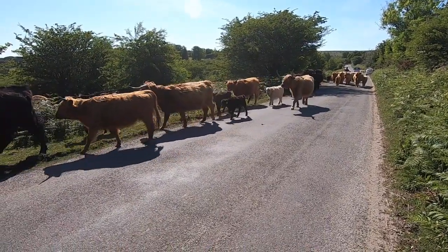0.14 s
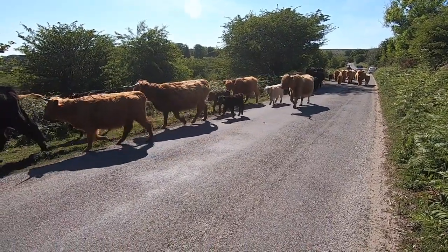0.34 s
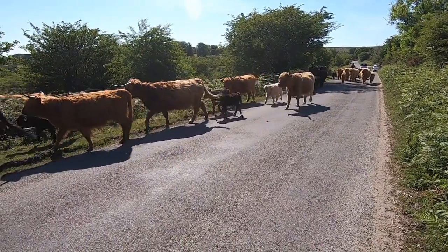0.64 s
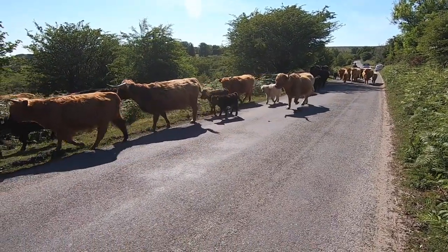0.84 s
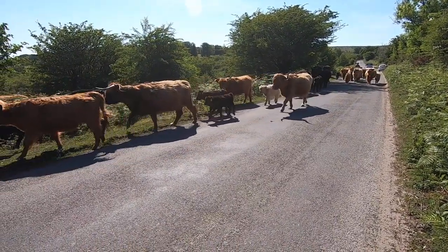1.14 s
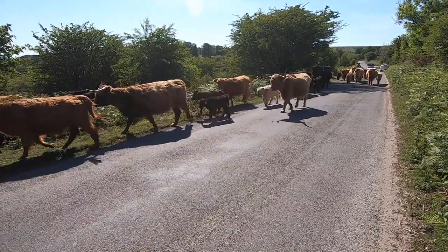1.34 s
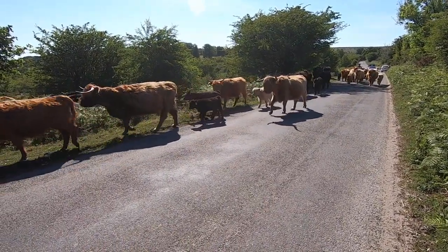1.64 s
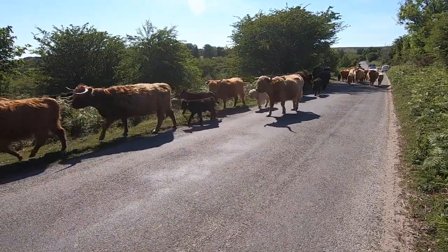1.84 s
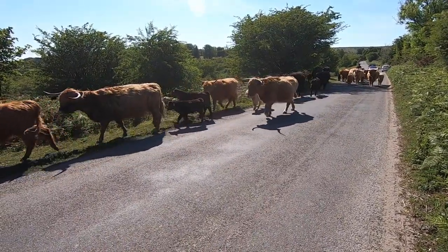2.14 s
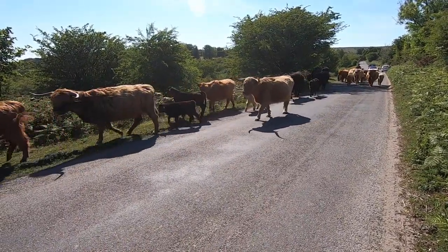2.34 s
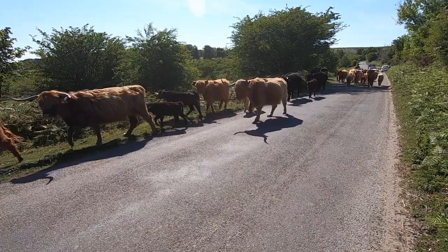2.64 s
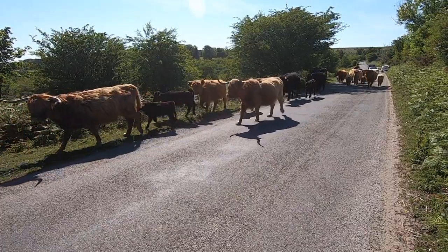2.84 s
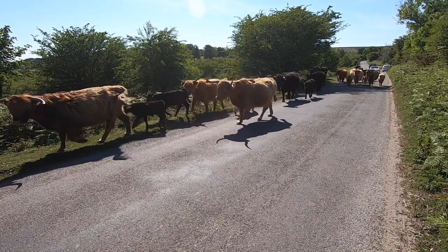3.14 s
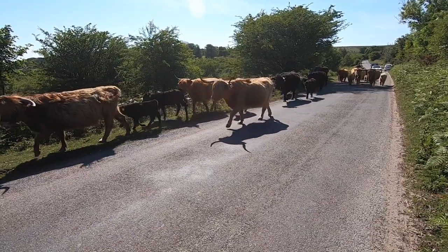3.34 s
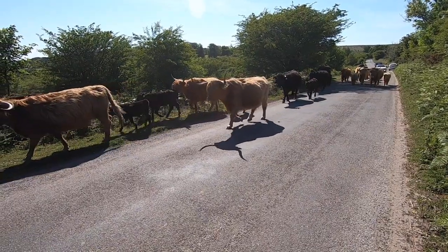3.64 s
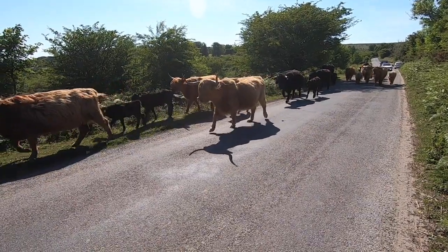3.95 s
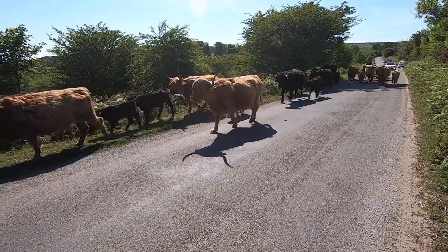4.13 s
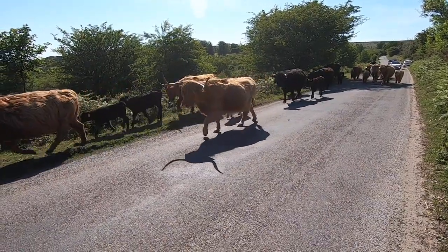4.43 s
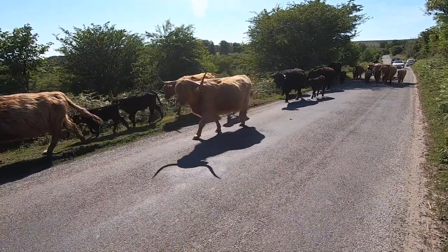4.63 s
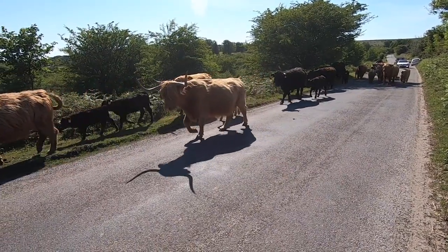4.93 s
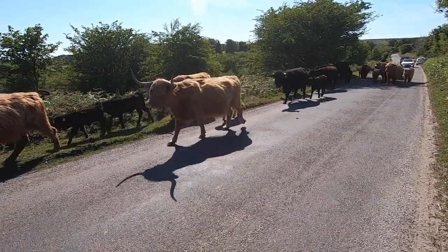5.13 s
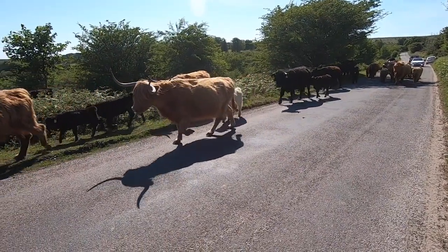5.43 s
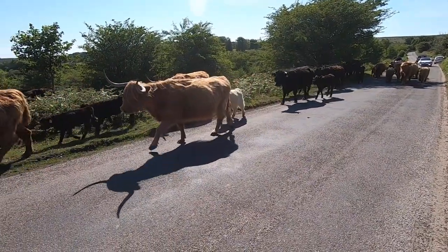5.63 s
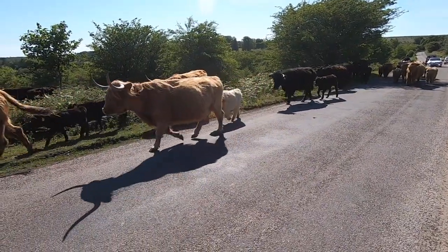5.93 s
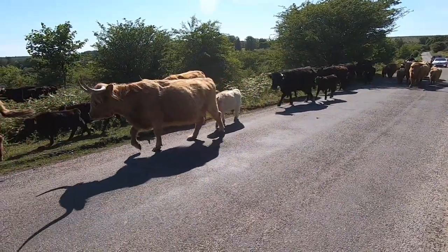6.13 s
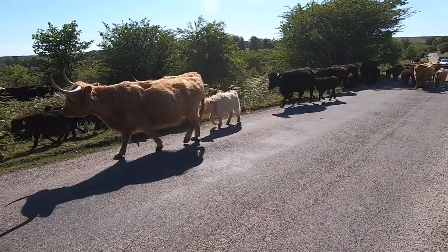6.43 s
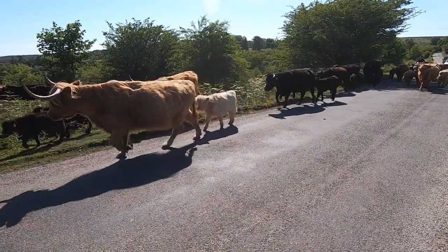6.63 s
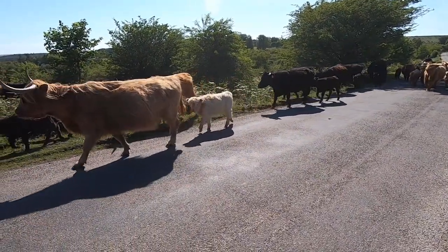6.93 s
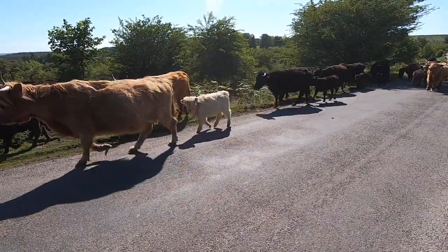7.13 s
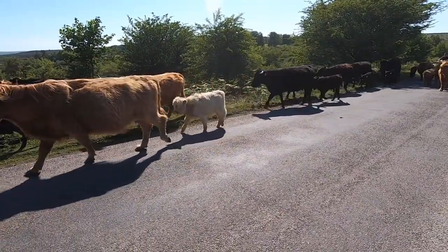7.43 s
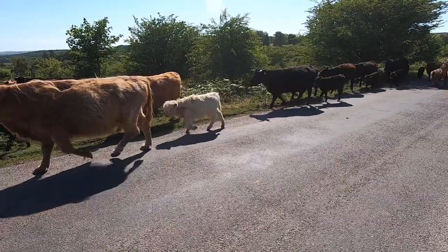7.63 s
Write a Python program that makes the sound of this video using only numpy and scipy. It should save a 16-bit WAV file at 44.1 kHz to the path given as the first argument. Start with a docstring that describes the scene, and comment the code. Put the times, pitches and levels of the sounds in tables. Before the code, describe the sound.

A nearby cow moos twice with rasping breaths between, hooves tick on a road, wind buffets the microphone, and a higher moo answers late.

```python
"""A near cow moos, draws a rasping breath and moos again, as a herd walks along a moorland road.
Another cow hums low; a higher-pitched one calls near the end. Calls are overtone pulses and leaking air through
throat resonances; rasps are uneven flaps and noise through a throat that widens. Hooves tick and bracken rustles
as filtered noise. Shaped noise makes the wind that buffets the microphone; a low throb of short sine swells
twice starts slowly and speeds up to some seventeen beats a second."""
import sys
import numpy as np
from scipy import signal
from scipy.fft import rfft, irfft, next_fast_len
from scipy.io import wavfile
from scipy.ndimage import uniform_filter1d, map_coordinates

SR = 44100
rng = np.random.default_rng(int(sys.argv[2]) if len(sys.argv) > 2 else 0)


def digitize_waveform(pressure):
    """Quantize a signal to 16-bit integers and store it at the path in sys.argv[1].

    Rows of a 2-D input are taken as channels; values are limited to [-1, 1].
    """
    field = np.atleast_2d(pressure).T
    bounded = np.clip(field, -1, 1)
    quanta = np.round(bounded * 32767).astype(np.int16)
    wavfile.write(sys.argv[1], SR, quanta)


N = 342818

# near cow's moos: (start [s], end [s], full pitch [Hz], taut chest level [dB], brightness [dB],
# leaking air [share], gape after start [s], gape width [s], held opening [0-1], closing push [0-1],
# level loss per unit of slack [dB])
MOOS = [(0.155, 0.628, 187.2, -21.5, -3.5, 0.6, 0.23, 0.062, 0.69, 0.11, 50),
        (1.655, 2.237, 190.7, -22, 2, 0.77, 0.23, 0.071, 0.66, 0.23, 44.5)]
# near cow's throat resonances, jaw up and jaw dropped: (centre [Hz], width [Hz], level [dB])
COW_THROAT = [(180, 172, 1), (534, 75, 12.5), (832, 130, 0.5), (1088, 245, 0), (1372, 140, -6.5),
              (1680, 170, 1), (1852, 100, -2.5), (2120, 85, -11.5), (2490, 260, -13.5), (2820, 290, -14),
              (3570, 540, -26.5), (4600, 500, -39), (5950, 900, -36.5), (8000, 1500, -49)]
GAPING_THROAT = [(180, 127, 9.5), (568, 120, 4), (818, 110, -3.5), (1064, 76, 8.5), (1350, 360, -4.5),
                 (1583, 79, 4), (1845, 210, 1.5), (2205, 260, -4.5), (2640, 230, -13), (3150, 270, -16),
                 (3900, 340, -28), (6040, 1000, -38.5), (7500, 1700, -37)]
# gasps between calls: (start [s], end [s], swell [s], lower throat level [dB], upper throat level [dB],
# flap rate [1/s], flap rate unevenness [dB], air against flaps [ratio])
RASPS = [(0, 0.335, 0.058, -62, -51.5, 80, 0.5, 0.51), (0.682, 1.29, 0.25, -46.5, -43, 86, 1.6, 0.6),
         (2.31, 2.986, 0.15, -43.5, -48, 85, 1.1, 0.54), (5.754, 6.43, 0.18, -59, -56, 210, 3.5, 2.9)]
# gasping throat resonances, before and after it widens: (centre [Hz], width [Hz], level [dB])
RASP_THROAT = [(766, 87, -3), (1091, 93, 1), (1390, 260, 0.5), (1680, 170, 6), (1900, 270, -6),
               (2390, 550, -28.5)]
WIDE_RASP_THROAT = [(781, 74, -0.5), (1020, 140, -7), (1330, 180, 6), (1745, 440, 2.5), (2390, 550, -28)]
# calls further back: (time [s], pitch [Hz], chest level [dB], mouth opening [0-1], roughness [0-1])
LOW_HUM = [(1.33, 79.55, -33.5, 0.57, 0.51), (1.43, 80.9, -31, 0.2, 0.26), (1.55, 86.5, -27, 0.21, 0.02),
           (1.68, 87.06, -28, 0.39, 0.22), (1.85, 86.15, -27.5, 0.47, 0.046), (2.15, 86.3, -48, 1, 0.2),
           (2.3, 80.9, -42, 0.85, 0.26), (2.39, 78.2, -52, 1, 0.47)]
HIGH_MOO = [(6.36, 221, -35, 0.1, 0.38), (6.43, 250.4, -26.5, 0.05, 0.22), (6.52, 284, -32, 0.12, 0.3),
            (6.58, 298, -42, 0.48, 0.5), (6.68, 328.6, -24, 0.2, 0.21), (6.745, 361, -26.5, 0.52, 0.8),
            (6.82, 379, -30, 0.66, 1), (6.87, 360, -27, 0.47, 0.75), (6.92, 324, -23.5, 0.3, 0.4),
            (7.02, 319, -22, 0.3, 0.2), (7.11, 315, -29.5, 0.61, 0.3), (7.19, 280, -30, 0.46, 0.75),
            (7.24, 238, -28.5, 0.45, 1), (7.28, 204, -31, 0.36, 1)]
FAR_GROAN = [(5.35, 79.6, -49, 0.08, 0.34), (5.7, 79.94, -43.5, 0.1, 0.4), (6.05, 77, -46, 0.38, 0.6),
             (6.25, 85.4, -37, 0.34, 0.49), (6.44, 98.4, -40, 0.44, 0.25)]
DISTANT_MOO = [(2.9, 385, -50.5, 0.2, 0.6), (3.35, 365.3, -52, 0.25, 0.61), (3.8, 409, -48, 0.55, 0.6),
               (4.35, 464.4, -51.5, 0.75, 0.96)]
# throat resonances of the further cows: (centre [Hz], width [Hz], level [dB])
HUM_THROAT = [(179, 85, 0), (249.4, 40, -9), (858, 180, -8.5), (1050, 580, -22), (1577, 330, -16),
              (1847, 150, -17), (2280, 87, -24.5)]
HIGH_THROAT = [(298, 200, -12.5), (747, 200, -5.5), (963, 160, -6.5), (1200, 160, -11), (1463, 260, -10.5),
               (1980, 240, -30), (2560, 780, -31)]
# hoof falls and kicked grit: (time [s], tick peak [dB], band centre [Hz], t60 [s])
HOOVES = [(0.075, -33, 2970, 0.013), (0.429, -33, 3370, 0.02), (0.522, -39, 3100, 0.013),
          (0.7, -45, 8000, 0.025), (1.042, -22, 2800, 0.016), (1.045, -28, 1100, 0.025),
          (1.43, -36, 3100, 0.025), (1.555, -38.5, 2520, 0.015), (2.846, -34.5, 2300, 0.033),
          (3.043, -27.5, 3900, 0.0087), (3.284, -32.5, 2140, 0.013), (3.53, -42, 3540, 0.03),
          (3.675, -27, 2670, 0.0085), (3.705, -27.5, 2880, 0.011), (3.808, -32, 1380, 0.016),
          (3.908, -42, 7040, 0.0083), (3.991, -37, 942, 0.025), (4.085, -35, 2382, 0.014),
          (4.114, -31, 1150, 0.024), (4.118, -41.5, 4500, 0.02), (4.342, -34.5, 4000, 0.015),
          (4.352, -39.5, 3560, 0.012), (4.411, -27.5, 566, 0.041), (4.428, -26, 510, 0.08),
          (4.491, -26, 1040, 0.011), (4.551, -34, 587, 0.03), (4.731, -37, 1550, 0.014),
          (4.859, -36.5, 1850, 0.012), (4.933, -28.5, 1430, 0.0093), (5.176, -39, 2600, 0.0091),
          (5.206, -35.5, 1200, 0.023), (5.423, -34, 1710, 0.019), (5.599, -41, 3300, 0.025),
          (6.033, -37.5, 3360, 0.018), (6.079, -27.5, 1560, 0.023), (6.407, -31.5, 1800, 0.01),
          (6.460, -31, 2700, 0.022), (6.545, -48, 7850, 0.018), (7.278, -35, 2330, 0.0098),
          (7.487, -44, 1500, 0.015), (7.497, -46, 7000, 0.023), (7.589, -36, 1910, 0.014),
          (7.606, -36, 3000, 0.028), (7.616, -30, 750, 0.064), (7.625, -51, 2580, 0.02),
          (7.657, -30, 554, 0.05), (7.677, -33, 2850, 0.011), (7.711, -35.5, 2340, 0.025)]
# ring of the hollow horn: (centre [Hz], width [Hz], level [dB])
HOOF_RING = [(800, 300, 3.5), (1010, 120, -4.5), (1500, 150, -5.5), (1750, 120, -6), (3480, 1000, -8)]
# faint squeaks: (time [s], half length [s], mean pitch [Hz], level [dB])
SQUEAKS = [(7.38, 0.011, 1010, -53), (7.433, 0.011, 972, -41), (7.505, 0.016, 967, -45),
           (7.542, 0.014, 977, -41.5), (7.61, 0.013, 674, -42), (7.664, 0.0057, 577, -35.5)]
# the two runs of the throb: (time [s], beat rate [1/s])
THROB_RATES = [
    [(0.04, 12.45), (0.6, 11.42), (1.25, 18.17), (2.05, 15.29), (2.75, 17.95), (3.7, 16.41), (4.3, 17.39)],
    [(5.158, 11.94), (5.45, 11.54), (6.15, 18.37), (6.5, 17.25), (7.77, 16.63)],
]
# throb strength before its tone is applied: (time [s], level [dB])
THROB_LEVEL = [(0.04, -30), (0.6, -24), (1.25, -23), (2.05, -22.5), (2.7, -21.5), (3.0, -28.5),
               (3.7, -28.5), (4.3, -29.5), (5.15, -25.5), (5.6, -24), (6.15, -19), (7.0, -20.5),
               (7.77, -31)]
# throb spectrum: (frequency [Hz], gain [dB])
THROB_TONE = [(60, -23.5), (125, -4.5), (160, 0), (190, -2), (230, 13.5), (300, -22.5), (450, -40),
              (900, -76)]
# slow gusts: (time [s], half length [s], level [dB])
GUSTS = [(0.95, 0.48, -41), (1.47, 0.14, -32), (2.0, 0.3, -34), (2.85, 0.39, -32.5), (3.78, 0.21, -32),
         (4.52, 0.19, -28.5), (6.55, 0.48, -36.5), (7.35, 0.3, -27)]
# wind rumble spectrum: (frequency [Hz], gain [dB])
WIND_TONE = [(10, -26), (22, -1), (40, 1), (90, 3), (140, 1), (250, -6.5), (400, -21.5), (700, -32),
             (1500, -75.5)]
# sharp buffets: (time [s], half length [s], relative level [dB])
BUFFETS = [(2.805, 0.033, -30.5), (3.132, 0.013, -30.5), (3.367, 0.018, -33), (3.721, 0.016, -28.5),
           (3.859, 0.02, -35), (3.952, 0.012, -28.5), (4.364, 0.014, -31.5), (4.437, 0.05, -26.5),
           (4.51, 0.019, -31), (4.639, 0.0074, -39), (4.699, 0.0096, -37), (5.46, 0.013, -28.5),
           (5.54, 0.024, -36.5), (7.068, 0.033, -15.5), (7.35, 0.01, -28.5), (7.441, 0.023, -28),
           (7.518, 0.04, -31), (7.659, 0.028, -30.5)]
# buffet spectrum: (frequency [Hz], gain [dB])
BUFFET_TONE = [(40, -9), (120, 10.5), (220, 7.5), (340, -1), (520, -11.5), (750, -25.5), (1200, -32.5),
               (3000, -77)]
# the herd's shuffle: (time [s], relative level [dB])
SHUFFLE = [(0, -51), (1.4, -49), (2.95, -52), (3.9, -51.5), (4.7, -53.5), (5.6, -52.5), (6.2, -50),
           (7.77, -53)]
# shuffle spectrum: (frequency [Hz], gain [dB])
SHUFFLE_TONE = [(150, -14.5), (250, 5), (370, 3.5), (500, -2.5), (630, -5.5), (880, 0), (1250, -9.5),
                (2000, -11), (3200, -16), (4200, -22.5), (5200, -32), (7000, -42.5), (10000, -63)]
# legs brushing through bracken: (time [s], half length [s], level [dB])
SWISHES = [(0.65, 0.14, -60), (1.45, 0.16, -62), (2.0, 0.25, -58.5), (2.95, 0.098, -69), (3.58, 0.11, -64),
           (6.5, 0.29, -65), (7.63, 0.14, -64)]
# bracken spectrum: (frequency [Hz], gain [dB])
BRACKEN_TONE = [(1500, -18), (3200, 8), (5000, 0), (7000, -5.5), (10000, -12), (13000, -22.5),
                (15000, -37.5)]

# moo: folds scoop, climb and sag; depths are shares of full pitch
SCOOP_DEPTH, SCOOP_S = 0.19, 0.13
CLIMB_DEPTH, CLIMB_S = 0.135, 0.38
SAG_DEPTH, SAG_S = 0.22, 0.052
SLACK_ROUGH, TAUT_ROUGH, GAPE_ROUGH = 2.0, 0.07, 0.1  # per unit of slack; constant; per unit of gape
GAPE_OPEN, MOO_ATTACK_S = 0.89, 0.071  # opening 0-1 at full gape
PUSH_BEFORE_END_S, PUSH_WIDTH_S = 0.045, 0.017  # mouth reopens for the last air
STRAIN_EDGE_DB = 17.5  # extra harshness per unit of tightening still to come
# voice
SHUT_DB, WIDE_DB = -27.5, 5.5  # mouth resonances against chest, lips shut and wide
ZIP_SPREAD_RAD, FLUTTER_PER_S = 0.1, 26.1  # lag per squared overtone number; overtone flutter rate
GLIDE_S = 0.06  # far pitch smoothing
# high moo, rough at its top and end: jitter and air grow with roughness
HIGH_JITTER, HIGH_AIR, HIGH_FLUTTER_DB = 0.06, 2.3, 3.5
# rasp
WIDEN_AT, WIDEN_OVER = 0.56, 0.14  # shares of the gasp
FLAP_SPREAD_DB, RASP_WANDER, RASP_RELEASE_S = 2, 0.012, 0.21  # wander: share of frequency
# ground, air, recorder
CONTACT_DB = 11  # first touch of the hoof, before filtering
RUSTLE_DB, BREEZE_DB = -68.5, -39.5  # steady floors
LUMPS_PER_S, LUMP_DB = 24, 2
CUTOFF_HZ = 14800

T = np.arange(N) / SR
PAD = next_fast_len(N + SR // 2, True) // 2 * 2
HZ = np.maximum(np.fft.rfftfreq(PAD, 1 / SR), 1)


def moo(start_s, end_s, full_hz, db, bright_db, air, gape_at_s, gape_s, held, push, slack_loss_db):
    """Near cow: fold tension sets pitch, level and roughness together; the jaw moves the resonances."""
    at, fade = span(start_s, end_s, MOO_ATTACK_S)
    since_s, left_s = T[at] - start_s, end_s - T[at]
    scoop = SCOOP_DEPTH * np.exp(-(since_s / SCOOP_S) ** 2.55)
    climb = CLIMB_DEPTH * np.maximum(1 - since_s / CLIMB_S, 0)
    tightening = scoop + climb
    sag = SAG_DEPTH * np.exp(-(left_s / SAG_S) ** 2)
    slack = tightening + sag
    gape = np.exp(-np.abs((since_s - gape_at_s) / gape_s) ** 3)
    pushing = push * np.exp(-((left_s - PUSH_BEFORE_END_S) / PUSH_WIDTH_S) ** 2)
    opening = held + (GAPE_OPEN - held) * gape + pushing
    jaw = np.clip(gape + 2.8 * pushing + 3.0 * tightening, 0, 1)
    rough = TAUT_ROUGH + SLACK_ROUGH * (tightening + 0.42 * sag) + GAPE_ROUGH * gape
    out = np.zeros(N)
    out[at] = fade * voice(
        full_hz * (1 - slack), db - slack_loss_db * slack, opening, rough,
        [(COW_THROAT, 1 - jaw), (GAPING_THROAT, jaw)], jitter=0.028, air=air, doubling=0.056,
        edge_db=bright_db - 12 + STRAIN_EDGE_DB * tightening, flutter_db=2.0, top_db=bright_db)
    return out


def voice(pitch_hz, chest_db, opening, rough, shapes, jitter, air, doubling, edge_db, flutter_db, top_db):
    """Folds snap shut each cycle; slack ones beat unevenly, strong and weak in turn, and leak air.
    Throat blends (resonances, share) shapes; an opening mouth lets out the upper resonances."""
    size, rough = len(pitch_hz), np.clip(rough, 0, 1)
    jittered_hz = pitch_hz * (1 + jitter * rough * drift(140, size))
    phase = 2 * np.pi * np.cumsum(jittered_hz) / SR
    # zip-like closing spreads each pulse in time; every overtone flutters on its own
    pulses = np.zeros(size)
    for k in range(1, int(CUTOFF_HZ / 2 / pitch_hz.max())):
        flutter = from_db(flutter_db * drift(FLUTTER_PER_S, size))
        pulses += flutter * np.cos(k * phase - ZIP_SPREAD_RAD * k ** 2)
    pulses = rms_one(pulses)
    shimmer = from_db(1.0 * rough * drift(110, size)) * (1 + doubling * rough * np.cos(phase / 2))
    breath = band(rng.standard_normal(size) * (1 + .5 * np.cos(phase)), 560, "high", order=5)
    leak = air * (rough + 0.031) * breath
    leak += 0.28 * band(breath, 2200, "high")
    source = pulses * shimmer + leak
    sound = sum(share * throat(source, resonances) for resonances, share in shapes)
    chest, rest = split(sound, 415)
    mouth, rest = split(rest, 1577)
    edge, top = split(rest, 4500)
    mouth_db = chest_db + SHUT_DB + (WIDE_DB - SHUT_DB) * opening
    upper = at_level(edge + from_db(top_db) * top, mouth_db + edge_db)
    return at_level(chest, chest_db) + at_level(mouth, mouth_db) + upper


def rasp(start_s, end_s, swell_s, low_db, high_db, flaps_per_s, uneven_db, air):
    """Indrawn air makes loose tissue flap unevenly; the throat widens as the chest fills."""
    at, fade = span(start_s, end_s, swell_s, RASP_RELEASE_S)
    size = len(at)
    cycles = np.cumsum(flaps_per_s * from_db(uneven_db * drift(90, size))) / SR
    strength_db = FLAP_SPREAD_DB * np.clip(rng.standard_normal(size), -2, 2)
    flaps = np.diff(np.floor(cycles), prepend=0) * from_db(strength_db)
    flow = rms_one(flaps) + air * rng.standard_normal(size)
    wide = .5 + .5 * np.tanh((np.linspace(0, 1, size) - WIDEN_AT) / WIDEN_OVER)
    sound = (1 - wide) * throat(flow, RASP_THROAT) + wide * throat(flow, WIDE_RASP_THROAT)
    # uneven playback speed makes the resonances wander
    position = np.cumsum(1 + RASP_WANDER * drift(9, size))
    low, high = split(map_coordinates(sound, [position], mode="reflect"), 980)
    out = np.zeros(N)
    out[at] = fade * (at_level(low, low_db, size=3000) + at_level(high, high_db, size=3000))
    return out


def far_call(call, resonances, jitter, air, doubling, edge_db, flutter_db):
    """Cow further back: own tune and mouth movement, one fixed throat shape."""
    at, fade = span(call[0][0], call[-1][0])
    pitch_hz, chest_db, opening, rough = in_time(call, T[at])
    pitch_hz = uniform_filter1d(pitch_hz, int(GLIDE_S * SR), mode="nearest")
    out = np.zeros(N)
    out[at] = fade * voice(pitch_hz, chest_db, opening, rough, [(resonances, 1)],
                           jitter, air, doubling, edge_db, flutter_db, top_db=3)
    return out


def hooves(spread, scuff_db, scuff_s, clop_db):
    """Each blow is a contact click and decaying grit noise, heard as a band-limited tick and a horn ring."""
    out, t = np.zeros(N + SR), T[:SR // 5]
    for (s, db, hz, t60_s), grit in zip(HOOVES, rng.standard_normal((len(HOOVES), len(t)))):
        blow = grit * (from_db(-60 * t / t60_s) + from_db(scuff_db) * np.exp(-t / scuff_s))
        blow[0] += from_db(CONTACT_DB)
        tick = band(blow, [hz / (1 + spread), hz * (1 + spread)], "band", order=1)
        tick = band(tick, 0.89 * hz, "low")
        clop = throat(blow, HOOF_RING)
        hit = tick / np.abs(tick).max() + from_db(clop_db) * clop / np.abs(clop).max()
        start = int(s * SR)
        out[start:start + len(t)] += from_db(db) * hit
    return out[:N]


def squeaks(waver):
    """Short thin sine notes with unsteady pitch."""
    out = np.zeros(N)
    for s, length_s, hz, db in SQUEAKS:
        phase = 2 * np.pi * np.cumsum(hz * (1 + waver * drift(300))) / SR
        out += from_db(db) * np.exp(-((T - s) / length_s) ** 2) * np.sin(phase)
    return out


def throb(run, pitch_hz, length_s, uneven_db):
    """One short sine swell of a few cycles per beat, each a little different."""
    t = T[span(run[0][0], run[-1][0])[0]]
    rate_per_s, = in_time(run, t)
    level_db, = in_time(THROB_LEVEL, t)
    beats = np.flatnonzero(np.diff(np.floor(np.cumsum(rate_per_s) / SR), prepend=-1))
    out = np.zeros(N)
    for beat, (detune, stretch, turn, strength) in zip(beats, rng.standard_normal((len(beats), 4))):
        at = np.flatnonzero(np.abs(T - t[beat]) < .05)
        age_s = T[at] - t[beat]
        swell = np.exp(-np.abs(age_s / (length_s * from_db(0.83 * stretch))) ** 3)
        swell *= from_db(level_db[beat] + uneven_db * strength)
        out[at] += swell * np.sin(2 * np.pi * (pitch_hz * (1 + 0.02 * detune) * age_s + turn))
    return colour(out, THROB_TONE)


def wind(buffet_db, depth):
    """Eddies at the microphone: rumble that deepens as it grows, plus brighter buffets."""
    level_db = swells(GUSTS, BREEZE_DB)
    deep, rest = split(colour(rng.standard_normal(N), WIND_TONE), 61)
    deep = deep * from_db(depth * (level_db - level_db.mean()))
    rumble = at_level(rest + deep, level_db, size=8000)
    rumble *= from_db(LUMP_DB * np.clip(drift(LUMPS_PER_S), -2, 2) - 0.5)  # eddies arrive in lumps
    hits = sum(from_db(db) * np.exp(-((T - s) / length_s) ** 2) for s, length_s, db in BUFFETS)
    eddies = np.tanh(at_level(colour(rng.standard_normal(N), BUFFET_TONE), -8, size=1300))
    return rumble + hits * from_db(buffet_db) * rms_one(eddies)


def herd(air_db, grit_db):
    """Far hooves and leaves blur into a hush; nearer grit and bracken stalks crackle over it."""
    level_db, = in_time(SHUFFLE)
    hush = rms_one(colour(rng.standard_normal(N), SHUFFLE_TONE))
    hush = from_db(air_db + 0.29 * drift(4.8)) * hush
    grit = from_db(grit_db) * rms_one(colour(band(grains(320, 4), 700, "high"), SHUFFLE_TONE))
    stalks = rms_one(colour(grains(500, 4.6) + 0.87 * rng.standard_normal(N), BRACKEN_TONE))
    return from_db(level_db) * (hush + grit) + from_db(swells(SWISHES, RUSTLE_DB)) * stalks


def grains(per_s, spread_db):
    """Clumps of tiny decaying noise snaps of very unequal size."""
    born = rng.random(N) < per_s * from_db(2.5 * drift(14)) / SR
    sizes = born * from_db(spread_db * np.minimum(rng.exponential(1, N), 3.5))
    decay = np.exp(-1 / (0.0035 * SR))
    envelope = signal.lfilter([1], [1, -decay], sizes + 1e-18)
    return rms_one(envelope * rng.standard_normal(N))


def thin_whistle(db):
    """Faint airy whistle: noise through two narrow high resonances, wavering in level."""
    at, fade = span(1.3, 2.35)
    air = rms_one(throat(rng.standard_normal(len(at)), [(5550, 440, 0), (4480, 290, -1)]))
    out = np.zeros(N)
    out[at] = from_db(db + 3 * drift(10, len(at))) * fade * air
    return out


def hedges(x, t60_s, wet_db):
    """Bushes and trees scatter back a faint dull tail: convolution with decaying noise."""
    t = T[:SR]
    tail = band(rng.standard_normal(SR), [350, 2800], "band", order=1)
    tail = tail * from_db(-60 * t / t60_s) * (1 - np.exp(-t / 0.0017))
    return from_db(wet_db) * signal.fftconvolve(x, tail / np.linalg.norm(tail))[:N]


def throat(x, resonances):
    """Steep resonances, made causal (minimum phase) so each pulse rings after it."""
    size = 2 * next_fast_len(len(x))
    hz = np.fft.rfftfreq(size, 1 / SR)
    gain = sum(from_db(db) / (1 + (2 * (hz - centre_hz) / width_hz) ** 2) ** 1.366
               for centre_hz, width_hz, db in resonances)
    cepstrum = irfft(np.log(gain))
    cepstrum[1:size // 2] *= 2
    cepstrum[size // 2 + 1:] = 0
    return irfft(rfft(x, size) * np.exp(rfft(cepstrum)))[:len(x)]


def colour(x, tone):
    """Shape by a spectrum, interpolated over log frequency."""
    hz, db = np.transpose(tone)
    gain = from_db(np.interp(np.log(HZ), np.log(hz), db))
    return irfft(rfft(x, PAD) * gain, PAD)[:N]


def band(x, edges_hz, kind, order=2):
    """Butterworth filter."""
    edges_hz = np.clip(edges_hz, 10, .45 * SR)
    return signal.sosfilt(signal.butter(order, edges_hz, kind, fs=SR, output="sos"), x)


def split(x, hz):
    """Parts below and above a frequency."""
    low = signal.sosfiltfilt(signal.butter(6, hz, fs=SR, output="sos"), x)
    return low, x - low


def at_level(x, db, size=1300):
    """Divide by running RMS over size samples, then apply a level curve."""
    return x * from_db(db) / np.sqrt(np.abs(uniform_filter1d(x ** 2, size)) + 1e-20)


def swells(rows, floor_db):
    """Level [dB] of Gaussian swells power-summed with a steady floor."""
    power = sum((from_db(db) * np.exp(-((T - s) / length_s) ** 2 / 2)) ** 2 for s, length_s, db in rows)
    return 10 * np.log10(power + from_db(floor_db) ** 2)


def span(start_s, end_s, attack_s=0.027, release_s=0.025):
    """Sample indices between two times, and a linear fade in and out."""
    at = np.flatnonzero((T >= start_s) & (T <= end_s))
    fade = np.minimum((T[at] - start_s) / attack_s, (end_s - T[at]) / release_s)
    return at, np.clip(fade, 0, 1)


def in_time(rows, t=T):
    """Columns of a curve, linearly interpolated."""
    s, *columns = np.transpose(rows)
    return [np.interp(t, s, column) for column in columns]


def drift(rate_per_s, size=N):
    """Unit-RMS random curve, linear between knots at the given rate."""
    knots = rng.standard_normal(size // 20 + 2)
    return rms_one(np.interp(np.arange(size) * rate_per_s / SR, np.arange(len(knots)), knots))


def rms_one(x):
    """Scale to unit power."""
    return x / np.sqrt(np.mean(x ** 2) + 1e-20)


def from_db(db):
    """Decibels to gain."""
    return 10 ** (np.asarray(db) / 20)


def scene():
    """Cattle, hooves and wind at one microphone."""
    cows = sum(moo(*row) for row in MOOS) + sum(rasp(*row) for row in RASPS)
    cows += far_call(LOW_HUM, HUM_THROAT, jitter=0.074, air=0.43, doubling=0.1, edge_db=-7.0, flutter_db=2.5)
    cows += far_call(FAR_GROAN, HIGH_THROAT, jitter=0.066, air=1.0, doubling=0.1, edge_db=-12, flutter_db=3)
    cows += far_call(HIGH_MOO, HIGH_THROAT, jitter=HIGH_JITTER, air=HIGH_AIR, doubling=0.2,
                     edge_db=-14, flutter_db=HIGH_FLUTTER_DB)
    cows += far_call(DISTANT_MOO, HIGH_THROAT, jitter=0.0794, air=2.9, doubling=0.3,
                     edge_db=-18.0, flutter_db=3.5)
    near = cows + hooves(spread=0.4, scuff_db=-16.5, scuff_s=0.026, clop_db=-13.0) + squeaks(waver=0.057)
    ground = herd(air_db=2.0, grit_db=-1.0) + thin_whistle(db=-69.0)
    lows = wind(buffet_db=0.3, depth=0.74)
    lows += sum(throb(run, pitch_hz=173.45, length_s=0.014, uneven_db=1.26) for run in THROB_RATES)
    return (near + hedges(near, t60_s=0.39, wet_db=-19) + ground + lows)[None]


def record(dry):
    """Steep low-pass: the top is cut."""
    return signal.sosfilt(signal.cheby2(12, 60, CUTOFF_HZ + 700, fs=SR, output="sos"), dry)


dry = scene()
out = record(dry)
digitize_waveform(out)
```